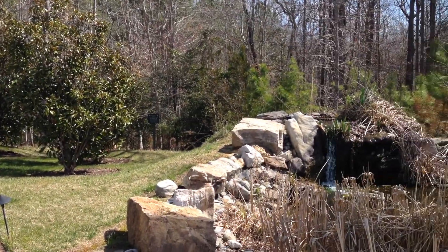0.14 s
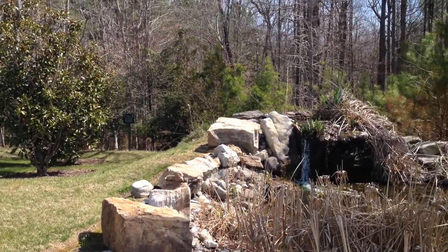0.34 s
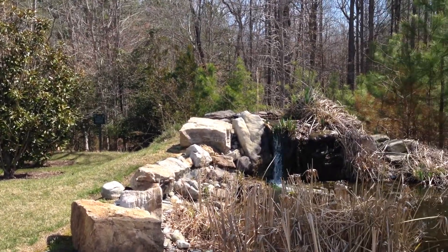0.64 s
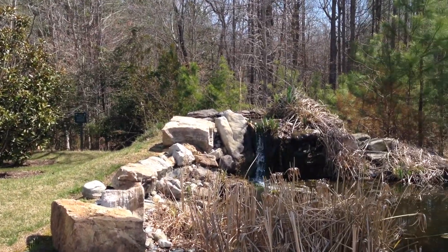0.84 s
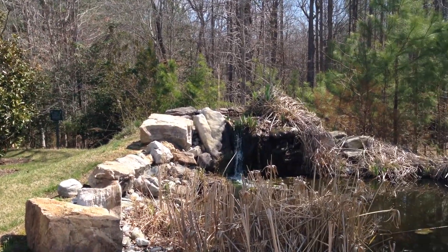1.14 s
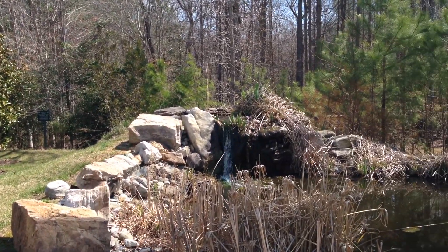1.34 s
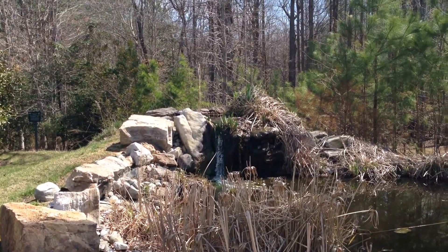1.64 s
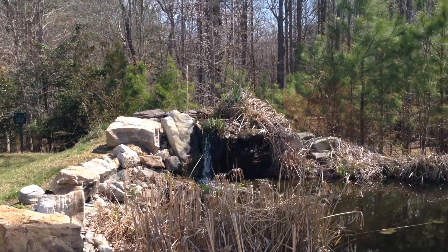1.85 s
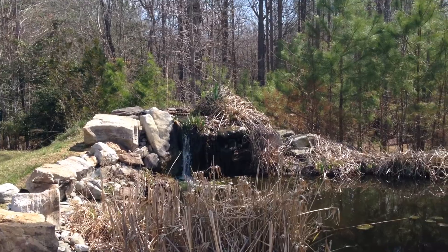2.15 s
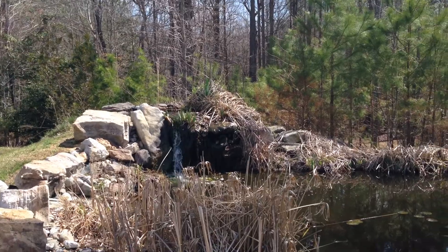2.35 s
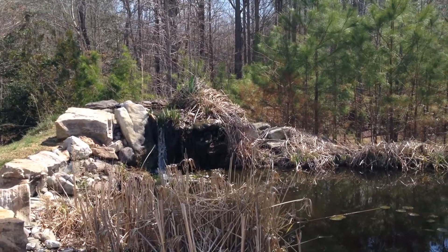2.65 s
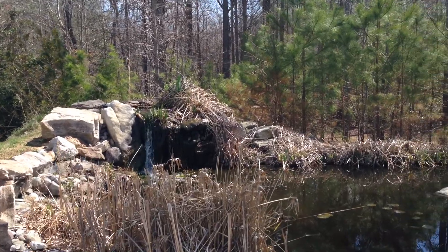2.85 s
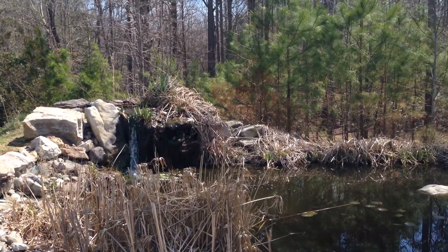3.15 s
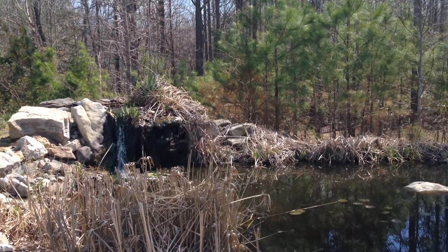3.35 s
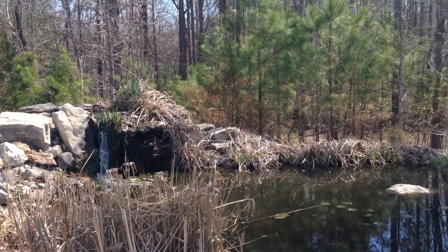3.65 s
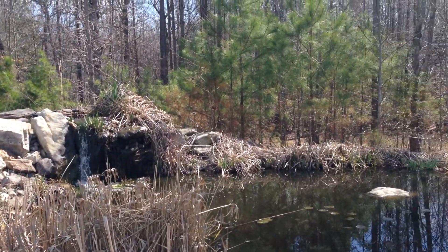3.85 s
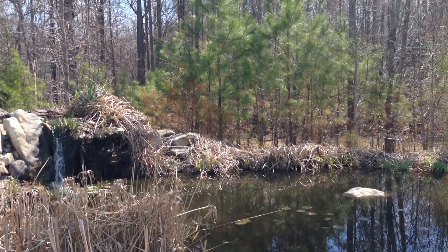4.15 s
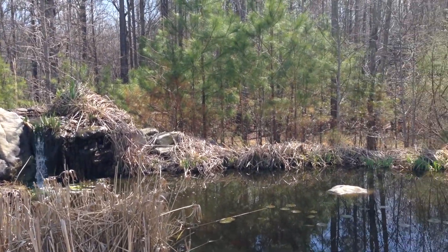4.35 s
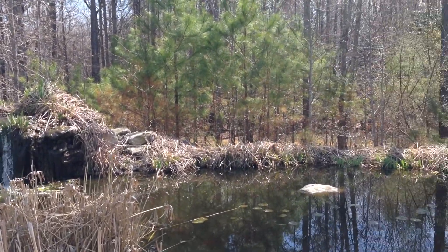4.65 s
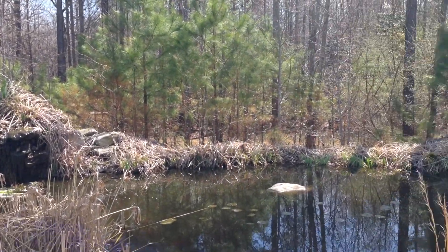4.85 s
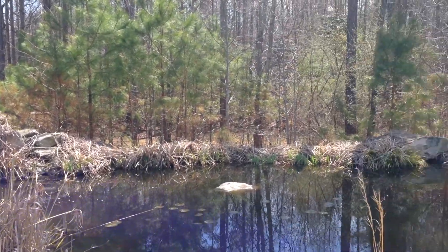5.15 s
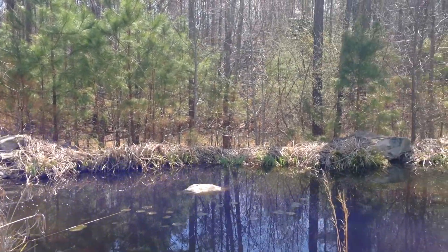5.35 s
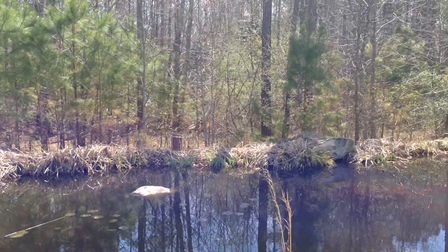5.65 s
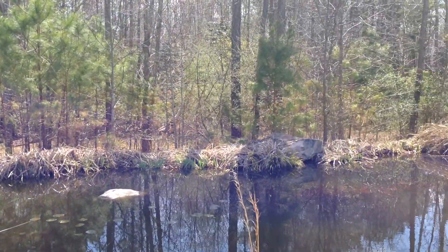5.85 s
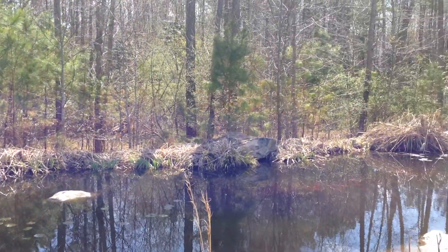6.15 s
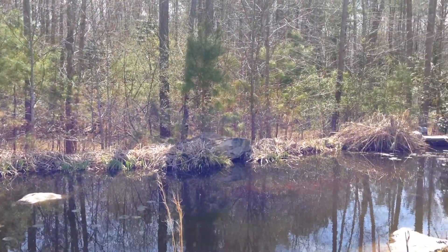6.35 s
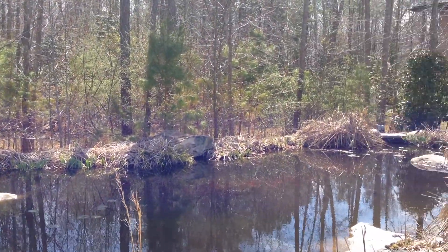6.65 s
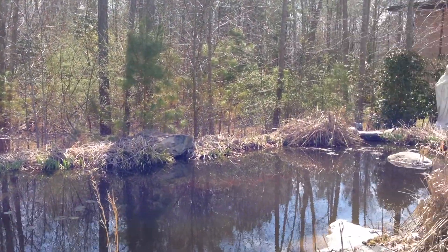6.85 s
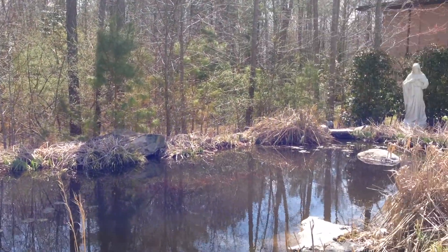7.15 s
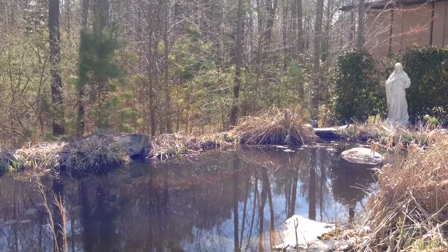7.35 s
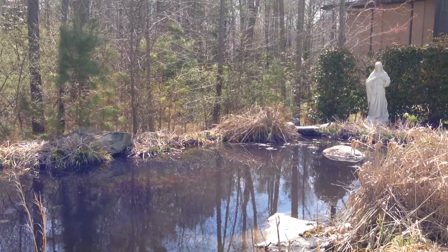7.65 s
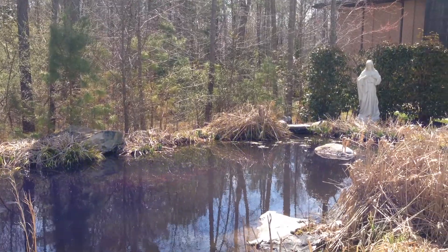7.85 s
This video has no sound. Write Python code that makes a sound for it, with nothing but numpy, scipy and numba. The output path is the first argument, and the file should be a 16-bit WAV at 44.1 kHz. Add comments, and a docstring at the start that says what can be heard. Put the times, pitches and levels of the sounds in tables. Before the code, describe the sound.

Outdoors, in mono, a thin stream falls over rocks into a garden pond for eight seconds. From 0 s the water is continuous but uneven: soft hissing spray, quick wet slaps and bubbles ringing around one to three kilohertz, coloured by a hollow near 1.8 and 2.2 kHz. Small splashes and short rising plips come often in the first two seconds, with a few deeper bloops; a crisp splash strikes at about 5 s and another at 6.1 s. A pump hums faintly at 120 Hz, dipping briefly before 2 s, over a distant gusty rumble. A thin 3.08 kHz whine flutters, sinks slightly in pitch around 2 s, swells near 6-7 s, nearly vanishes at 7.5 s, then returns and rises slightly. As the camera turns away, the water's tone changes and drops slightly after 6 s. A faint drone near 300 Hz grows late; a soft low knock lands at 7.75 s.

```python
"""A thin stream spills over stacked rocks into a garden pond, heard by a camera that turns slowly away.
From the start, noise makes the spray and slaps, and gliding sines make the bubbles; splashes land on top.
A pump hums, dipping briefly in the first two seconds, over a far rumble of noise. A thin sine whine,
perhaps from a motor in the camera, drifts a few hertz down and later back up.
Towards the end a low drone grows out of the rumble, and something softly knocks the camera body."""
import sys
import numpy as np
from scipy import signal
from scipy.fft import rfft, irfft, next_fast_len
from scipy.io import wavfile
from scipy.ndimage import uniform_filter1d
from numba import njit

SR = 44100
rng = np.random.default_rng(int(sys.argv[2]) if len(sys.argv) > 2 else 0)


def materialize(psi):
    """Save the field psi as 16-bit PCM at rate SR to the path in sys.argv[1].

    A 1-D psi becomes a single channel; in a 2-D psi each row is a channel.
    """
    bounded = np.clip(np.atleast_2d(psi).T, -1, 1)
    quanta = np.round(bounded * 32767).astype(np.int16)
    wavfile.write(sys.argv[1], SR, quanta)


N = 353241  # length in samples, about 8 s
T = np.arange(N) / SR  # time of each sample, in seconds


def undb(db):
    """Turn decibels into a plain multiplier."""
    return 10 ** (np.asarray(db) / 20)


def level(x, db):
    """Set the average (RMS) level of a sound."""
    return x * undb(db) / np.sqrt(np.mean(x ** 2))


def curves(table):
    """Join each column of a table by straight lines in time."""
    s, *columns = np.transpose(table)
    return [np.interp(T, s, column) for column in columns]


def colour(x, hz, db):
    """Shape the spectrum along points joined on a log-frequency axis."""
    size = next_fast_len(N)
    log_hz = np.log(np.arange(1, size // 2 + 2) * SR / size)
    gain = undb(np.interp(log_hz, np.log(hz), db))
    return irfft(rfft(x, size) * gain, size)[:N]


def flat(x):
    """Even out the long-term spectrum, keeping the grain."""
    spectrum = rfft(x)
    smooth_power = uniform_filter1d(np.abs(spectrum) ** 2, size=4001)
    return irfft(spectrum / np.sqrt(smooth_power), N)


def walk(rate):
    """Wander between random levels, `rate` new ones a second, with a spread of 1."""
    hold = int(SR / rate)
    steps = np.repeat(rng.standard_normal(N // hold + 1), hold)
    smooth = uniform_filter1d(steps, hold)[:N]
    return smooth / smooth.std()


@njit
def rings(count, start, hz, cycles, size, glide):
    """Sines that swell quickly, then fade 20 dB per `cycles` as their pitch climbs by the share glide."""
    out = np.zeros(count)
    for k in range(len(start)):
        length = int(2.5 * cycles[k] * SR / hz[k])  # long enough to fade 50 dB
        phase = 0.
        for i in range(min(length, count - start[k])):
            done = i / length
            phase += 2 * np.pi * hz[k] * (1 + glide * done) / SR
            envelope = np.exp(-5.76 * done) * min(8 * done, 1.)
            out[start[k] + i] += size[k] * np.sin(phase) * envelope
    return out


def bubbles(rate, low_hz, high_hz, cycles, spread_db, glide):
    """Air pockets of many sizes ring at chance moments, some louder than the rest."""
    when, pitch, loud, ring = rng.random((int(rate * N / SR), 4)).T
    hz = low_hz * (high_hz / low_hz) ** pitch
    # high bubbles are short and sparse per hertz, so they start stronger
    size = hz / low_hz * undb(spread_db * (loud ** 2 - 1))
    return rings(N, (when * N).astype(np.int64), hz, cycles * (.5 + ring), size, glide)


def spatter(rate, spread_db, t60, rise):
    """Loudness of lumps of water landing: quick rises of uneven size, each falling 60 dB in t60 s."""
    when, loud = rng.random((int(rate * N / SR), 2)).T
    hits = np.zeros(N)
    hits[(when * N).astype(int)] = undb(2 * spread_db * loud ** 2)  # doubled dB: these are powers
    keep = 1e-6 ** (1 / (t60 * SR))
    power = signal.lfilter([1], [1, -keep], hits)
    return np.sqrt(np.abs(uniform_filter1d(power, int(rise * SR))))


def falling_water():
    """Spray hisses, lumps slap and air bubbles ring, all in uneven gushes as the stream breaks up."""
    surge = undb(0.21 * walk(11) + 0.61 * walk(30))
    spray = level(rng.standard_normal(N), -2.3)
    slap_envelope = spatter(rate=140, spread_db=12, t60=0.021, rise=0.0094)
    slaps = level(slap_envelope * rng.standard_normal(N), -5.0)
    gurgle = bubbles(rate=600, low_hz=299.3, high_hz=3220, cycles=13.0, spread_db=10.0, glide=0.27)
    fizz = bubbles(rate=2000, low_hz=2487, high_hz=14180, cycles=10.8, spread_db=15.5, glide=0.25)
    plops = bubbles(rate=60, low_hz=344.7, high_hz=1426, cycles=12.0, spread_db=9.0, glide=0.3)
    trickle = bubbles(rate=900, low_hz=1051, high_hz=2401, cycles=22.6, spread_db=8, glide=0.26)
    # bubbles of like size come in clusters as the trickle breaks up
    clusters = undb(3.2 * np.tanh(walk(40)))
    ringing = level(gurgle, -13.0) + level(clusters * trickle, -13.0) + level(fizz, -7.5) + level(plops, -18.5)
    return flat(surge * (spray + slaps + ringing))


# The fall as the camera turns.
# Columns: start_s, level_db, turned_away (0 to 1), treble_lift_db (above about 6 kHz)
FALL = [(0, -49, 0, 1.5), (.8, -48.5, 0.13, -1), (2.2, -48.5, 0.14, 1.1), (3, -49, 0.16, -0.5),
        (3.8, -49, 0.44, -0.5), (4.75, -48.5, .42, 0.5), (5.2, -48.5, 0.37, 0), (5.75, -49.2, 0.44, 0),
        (6.2, -49, 0.75, -1.5), (6.8, -51, 0.87, 0), (8.01, -50.5, 0.9, 0)]
# Colour of the water; the hollow behind the fall rings near 1.8 and 2.2 kHz.
# Columns: pitch_hz, then dB per Hz: facing_db, half_turned_db, turned_away_db
WATER_COLOUR = [(200, -24, -20, -16), (450, -15, -13, -11), (530, -12, -6.5, -7.5), (630, -10, -9.5, -11),
                (760, -4.5, -4.5, -6), (950, -4.5, -3, -1.5), (1300, -3.5, -4, -3), (1780, 0, 0, 0),
                (2030, -6, -3.5, -2), (2200, -1, -1.5, -4), (2450, -6.5, -4, -1.5), (2620, -12.5, -7.5, -3),
                (2850, -6, -3, -5), (3400, -5.5, -4.5, -7), (4200, -11, -7, -8.5), (4700, -9, -9, -7),
                (5900, -12, -11.5, -11.5), (6700, -15, -10.5, -9.5), (7300, -15.5, -12.5, -14),
                (10000, -17.5, -17, -19), (15500, -28, -30, -35)]


def fall():
    """Spray, spatter and bubbles share the colour of the hollow, which changes as the camera turns."""
    water = falling_water()
    hz, *views = np.transpose(WATER_COLOUR)
    level_db, turn, treble_db = curves(FALL)
    heard = 0
    for k, view_db in enumerate(views):
        share = np.clip(1 - np.abs(2 * turn - k), 0, 1)  # blend the two nearest views
        heard = heard + share * level(colour(water, hz, view_db), 0)
    # the finest spray flickers more than the body of the fall
    treble = colour(heard, [4500, 6500], [-30, 0])
    flicker = undb(treble_db + 0.71 * walk(4.5) + 0.51 * walk(16))
    return undb(level_db) * (heard + (flicker - 1) * treble)


# The loudest splashes.
# Columns: start_s, tick_peak_db, spatter_db (before its fade), centre_hz, half_width_octaves
SPLASHES = [(.097, -42, -40, 3760, 0.41), (0.843, -40, -35, 1600, 0.6), (1.330, -33, -42, 2000, 0.59),
            (.03, -40, -39.5, 2600, 0.82), (.239, -50, -36, 1760, 0.28), (.449, -42, -40, 2800, 0.58),
            (.698, -47, -41, 2230, .25), (1.249, -40, -42, 1660, 0.29), (1.56, -43, -43, 1740, .3),
            (1.913, -40, -41, 1780, 0.79), (2.480, -39, -44, 3900, 0.29), (2.588, -39, -49, 1730, .3),
            (2.821, -34, -38, 1900, 1.2), (3.743, -49, -42, 3420, 0.44), (3.879, -42, -37, 1600, 1.6),
            (3.969, -43, -48, 4230, 0.24), (4.074, -44, -48, 1640, 0.64), (4.19, -42, -40, 2600, 1),
            (4.288, -40, -47, 3200, .5), (4.53, -50, -45, 9500, .4), (4.667, -42, -42, 4200, .3),
            (4.922, -44, -41, 6500, 0.064), (5.023, -50, -48, 6500, .1), (4.945, -50, -45, 4500, .15),
            (4.9853, -26, -35.5, 2700, 0.85), (5.187, -39, -39, 3600, 1), (5.412, -36, -45, 3000, 0.9),
            (5.659, -57, -37, 2920, 0.12), (5.758, -46, -37.5, 1800, 0.67), (6.132, -31, -40, 2000, 0.63),
            (6.257, -40, -41, 2060, 0.39), (6.582, -41, -46, 4970, 0.61), (6.639, -46, -45, 5800, .3),
            (6.932, -40, -45, 4500, 0.55), (7.088, -38, -38, 1980, 0.33)]


def splashes():
    """The tick of a lump of water striking, then a short spatter around the same pitch."""
    out, t = np.zeros(N + SR), T[:SR // 10]
    fade = undb(-60 * t / .024) * np.minimum(t / .0015, 1)  # rise in 1.5 ms, fall 60 dB in 24 ms
    for s, tick_db, spatter_db, hz, width in SPLASHES:
        edges_hz = hz * 2. ** np.array([-width, width])
        band = signal.butter(3, edges_hz, "band", fs=SR, output="sos")
        tick = signal.sosfilt(band, 1. * (t == 0))  # one click through the band
        spray = signal.sosfilt(band, rng.standard_normal(len(t)))
        i = int(s * SR)
        out[i:i + len(t)] += undb(tick_db) * tick / np.abs(tick).max() + level(spray, spatter_db) * fade
    return out[:N]


# Single bubbles that ring out of the splash.
# Columns: start_s, pitch_hz (at the start), peak_db, fade_cycles (to fall 20 dB)
PLIPS = [(.136, 1640, -41, 9), (.275, 2150, -41, 17), (.33, 720, -47.5, 12), (.395, 1560, -45, 9),
         (.45, 2150, -42, 14), (.517, 2120, -42, 9), (.585, 990, -48, 10), (.645, 1340, -40, 8.3),
         (.776, 1780, -40, 12), (.955, 1700, -43, 14), (1.1, 1800, -43, 14), (1.452, 1600, -44, 18),
         (1.505, 2100, -40, 16), (1.59, 1500, -43, 14), (1.722, 2020, -42, 10), (1.91, 1750, -42, 14),
         (1.853, 1750, -38.5, 13), (3.152, 2140, -42, 9), (3.27, 2080, -39.5, 9), (3.442, 995, -45, 9),
         (4.19, 943, -44, 10), (4.672, 2140, -45, 9), (4.717, 1100, -42, 9), (4.856, 2150, -46, 53),
         (4.872, 1500, -49, 12), (4.922, 1770, -48, 9), (5.4126, 1510, -37, 9), (5.776, 1900, -41, 10),
         (5.898, 980, -41.5, 5.4), (6.011, 2300, -42, 13), (6.093, 1040, -45, 5), (6.176, 2040, -47, 16),
         (6.826, 933, -44.5, 9.8), (7.029, 1730, -47, 9), (7.137, 1600, -40.5, 10), (7.378, 680, -52, 13),
         (7.815, 865, -51, 17), (7.915, 1270, -45, 12), (.01, 230, -46, 7.1), (.35, 200, -48.5, 9.6),
         (.745, 195, -48.5, 7.6), (2.165, 210, -48, 9.8), (2.48, 293, -53.5, 10), (3.3, 190, -52, 11),
         (3.61, 162, -50, 8.8), (4.44, 155, -48, 7.1), (5.27, 218, -53, 7.2), (6.74, 177, -51, 8),
         (6.92, 210, -49, 8), (7.61, 420, -52, 12), (7.82, 393, -55, 12)]


def plips():
    """The loudest single bubbles, each a short rising note."""
    s, hz, db, cycles = np.transpose(PLIPS)
    size = 2 * undb(db)  # a ring peaks at about half its size
    return rings(N, (s * SR).astype(np.int64), hz, cycles, size, glide=0.16)


# Level of the whine, before its flutter. Columns: start_s, level_db
WHINE_LEVEL = [(0, -53.5), (.5, -53.5), (1.1, -52), (1.35, -50.5), (1.65, -51.5), (1.8, -57.5),
               (2.05, -49.5), (2.12, -56.5), (2.2, -54), (2.32, -58), (2.47, -58), (2.95, -50.5),
               (3.35, -52), (3.76, -55.5), (4.12, -52.5), (4.46, -55.5), (4.92, -52.5), (5.13, -56.5),
               (5.58, -56), (5.65, -53), (5.95, -48.5), (6.6, -49.5), (6.97, -46.5), (7.2, -49),
               (7.48, -59.5), (7.82, -49.5), (7.9, -53.5), (7.97, -49), (8.01, -51.5)]
# Steady pitches of the whine joined by glides. Columns: start_s, pitch_hz
WHINE_PITCH = [(0, 3082.5), (1.7, 3081), (2.3, 3071.7), (7.45, 3071.7), (7.8, 3075), (8.01, 3082)]
WHINE_FLUTTER_DB = 0.9  # spread of the random wavering


def whine():
    """A thin sine that swells and fades as the camera turns, fluttering a little."""
    (hz,), (db,) = curves(WHINE_PITCH), curves(WHINE_LEVEL)
    loudness = np.sqrt(2) * undb(db + WHINE_FLUTTER_DB * walk(16))
    return loudness * np.sin(2 * np.pi * np.cumsum(hz) / SR)


HUM_HZ = 119.98
# Level of the hum, before its dips. Columns: start_s, level_db
HUM_LEVEL = [(0, -57.5), (1.6, -57), (2, -57.5), (4.5, -55.5), (8.01, -56)]
# Moments when the hum dips briefly. Columns: centre_s, depth_db, half_length_s
HUM_DIPS = [(.54, -9, .11), (.8, -6, .03), (1, -3, .03), (1.6, -5, .04), (1.79, -17, .09)]


def pump():
    """A hum at twice the mains frequency, from the magnetic pull in the motor."""
    db, = curves(HUM_LEVEL)
    for s, depth_db, half in HUM_DIPS:
        db = db + depth_db * np.exp(-((T - s) / half) ** 2)
    return np.sqrt(2) * undb(db) * np.cos(2 * np.pi * HUM_HZ * T)


# Colour of the far rumble. Columns: pitch_hz, level_db (per Hz, relative)
RUMBLE_COLOUR = [(15, -44), (25, -23), (50, -1), (75, 0.5), (87, 4), (100, -3.5), (150, -2), (175, 1),
                 (190, 1.5), (210, 0), (260, -4.5), (400, -11.5), (800, -25)]
# Level of the far rumble. Columns: start_s, level_db
RUMBLE_LEVEL = [(0, -56), (2, -57.5), (4, -56), (5.5, -57), (8.01, -59.5)]
# Level of a low drone, strongest near 300 Hz, that grows at the end. Columns: start_s, level_db
DRONE_LEVEL = [(0, -83), (4.8, -84), (5.3, -75), (6.5, -69), (7.4, -70.5), (8.01, -66)]


def rumble():
    """The gusty roar of far traffic, with a low drone shaped from the same noise."""
    gusts = undb(1.1 * walk(5) + 1.05 * walk(18))
    far = gusts * rng.standard_normal(N)
    drone = level(colour(far, [200, 308, 530, 825], [-18, 5.5, -5, -35]), 0)
    roar = level(colour(far, *np.transpose(RUMBLE_COLOUR)), curves(RUMBLE_LEVEL)[0])
    return roar + drone * undb(curves(DRONE_LEVEL)[0])


BUMP_S, BUMP_HZ, BUMP_DB = 7.751, 132, -38  # middle of the knock, its pitch, its size before the envelope


def bump():
    """A soft knock on the camera body: a short, low swing of pressure, rising and then dipping."""
    cycles = (T - BUMP_S) * BUMP_HZ
    return -undb(BUMP_DB) * np.sin(2 * np.pi * cycles) * np.exp(-(cycles / 0.52) ** 2)


def scene():
    """Add all the sources into one channel."""
    return (fall() + splashes() + plips() + whine() + pump() + rumble() + bump())[None]


def record(dry):
    """The recorder cuts the top steeply, above 15330 Hz."""
    steep_cut = signal.ellip(12, .2, 70, 15330, fs=SR, output="sos")
    return signal.sosfilt(steep_cut, dry)


dry = scene()
out = record(dry)
materialize(out)
```